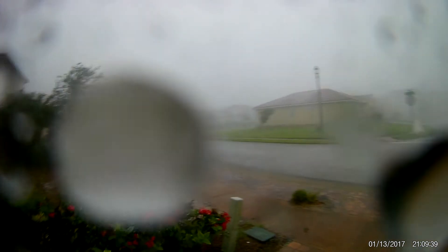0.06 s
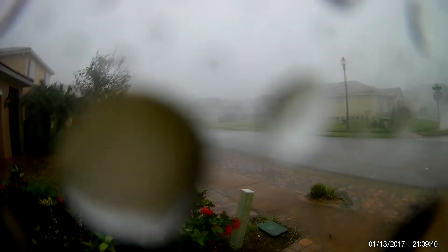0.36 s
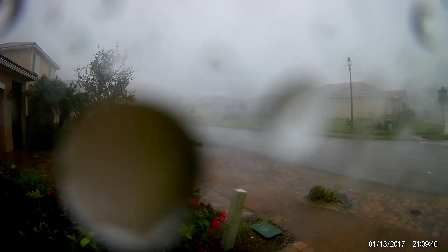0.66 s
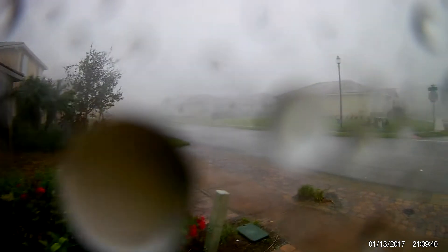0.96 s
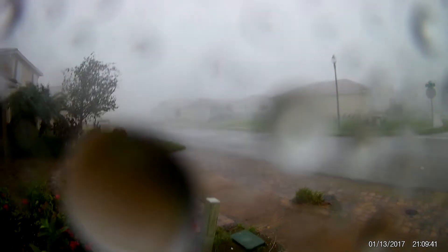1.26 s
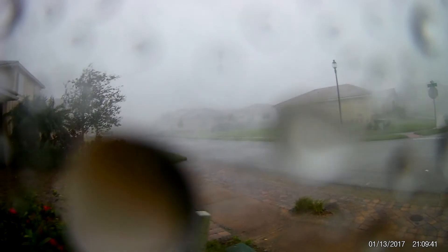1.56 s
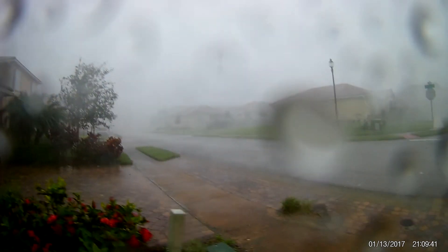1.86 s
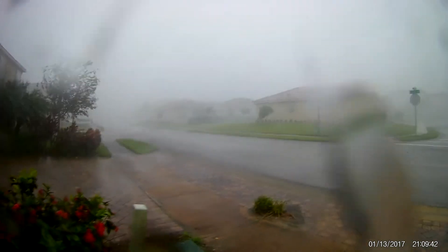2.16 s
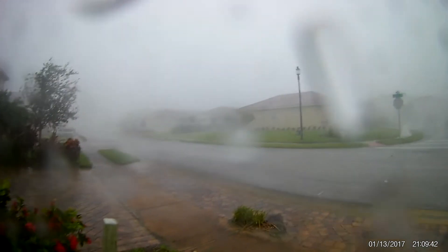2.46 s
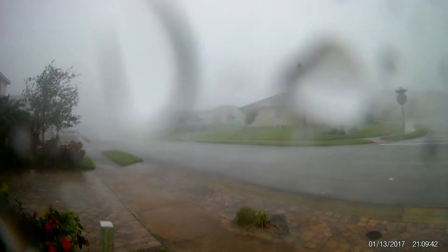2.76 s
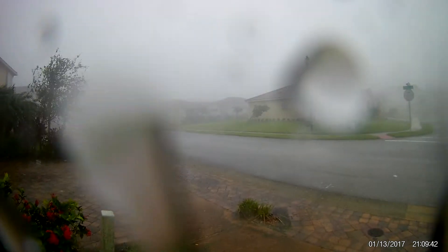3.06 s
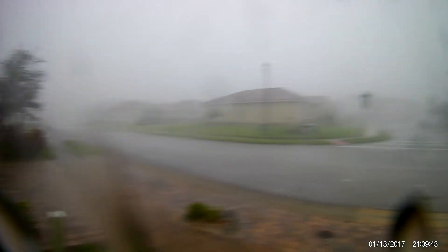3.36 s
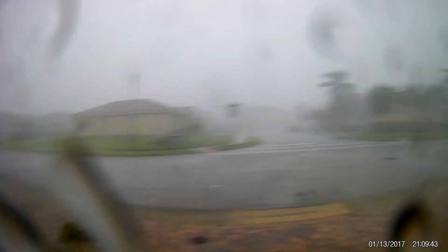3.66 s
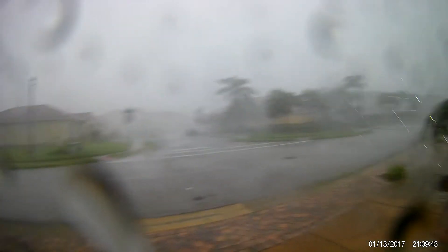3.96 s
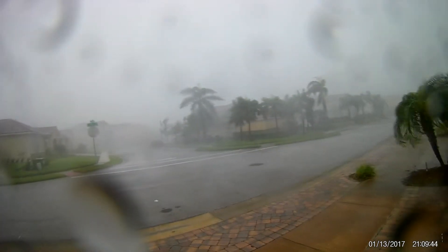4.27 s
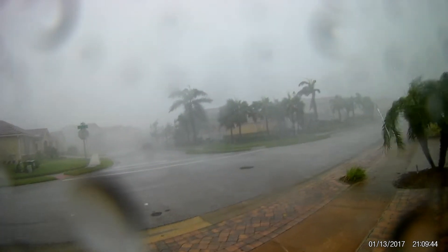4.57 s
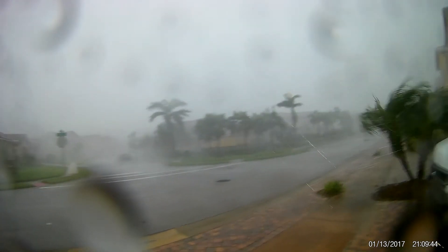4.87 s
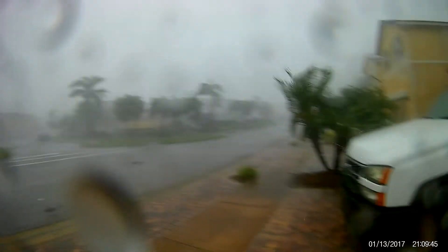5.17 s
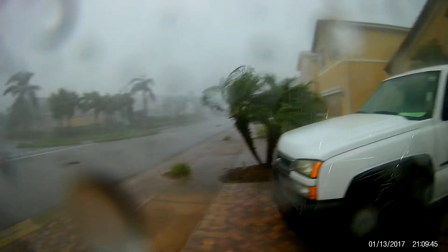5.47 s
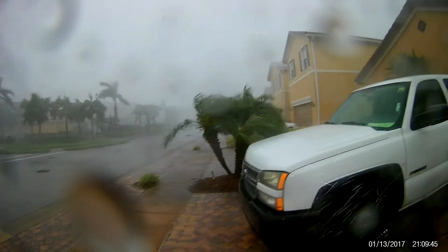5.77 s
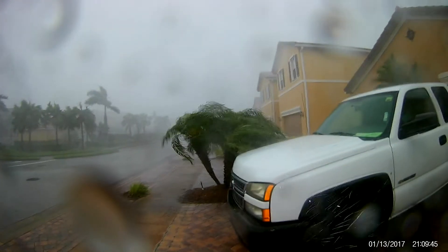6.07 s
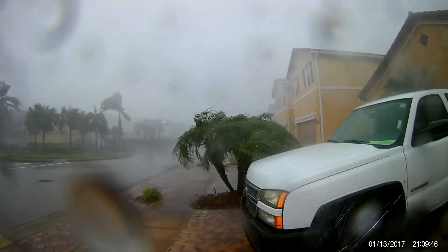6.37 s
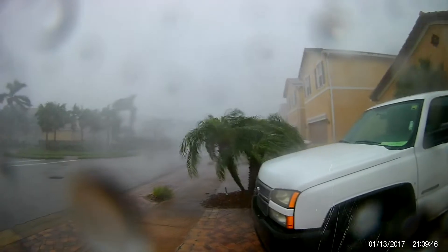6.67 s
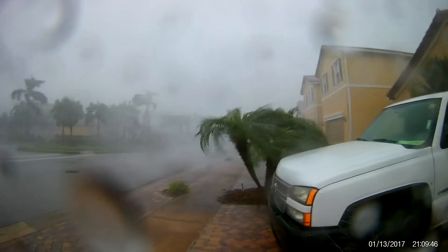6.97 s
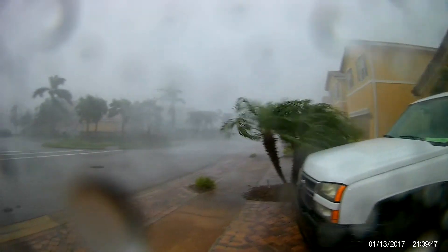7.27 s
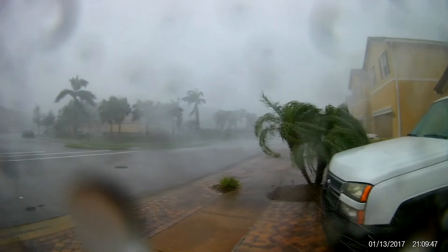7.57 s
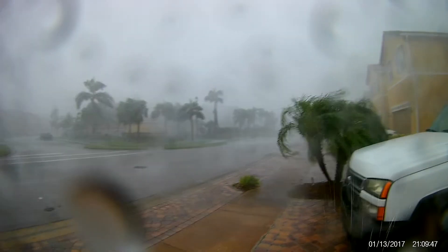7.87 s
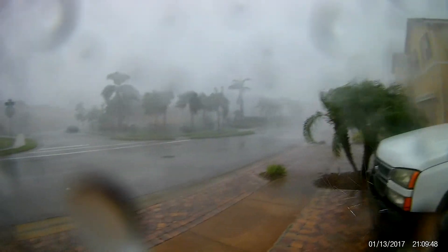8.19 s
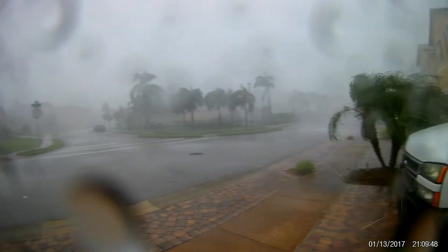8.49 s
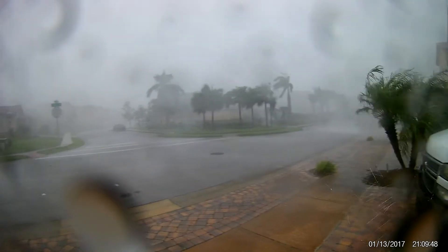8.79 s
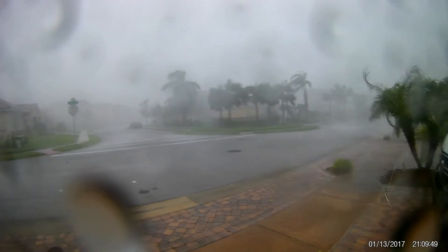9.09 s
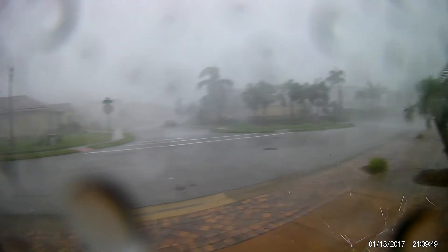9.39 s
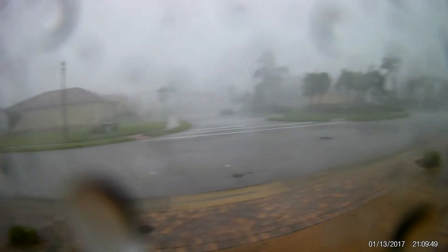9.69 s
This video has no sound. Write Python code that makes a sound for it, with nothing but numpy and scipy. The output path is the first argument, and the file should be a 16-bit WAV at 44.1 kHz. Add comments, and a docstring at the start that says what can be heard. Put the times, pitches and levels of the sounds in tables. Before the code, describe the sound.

Wind-driven rain hits a plastic case around the microphone, making a close, dense crackle of pattering drops, sharp knocks and sizzling spray, with a few tiny plops. Behind it run a muffled wash of rain on the street and a low, uneven wind rumble. The first second is heavy, with sheets of rain and a bright, fading fizz. After a brief easing around 1.5 seconds, a gust gives the case a dull, wet thump at about 2 seconds, and busy tapping continues until 3.5. The rain thins from there to about 5.3, while the rumble swells slightly near 4. Hard knocks return between 5.4 and 6.7 seconds, followed by a lull from 7 to nearly 8. The rain then builds again, with a hissing sheet of spray at 9 seconds, the sharpest knock at about 9.5 and another surge at the end.

```python
"""Wind-driven rain beats on a camera in a waterproof case, held outdoors in a storm.
Each drop rings the plastic for a few milliseconds: big ones knock, small ones patter, spray sizzles.
Some drops trap a bubble and plop. Gusts swell and ease the rain, and midway it meets another wall
of the case. Behind it lie the muffled wash of the street and a low rumble of wind."""
import sys
import numpy as np
from scipy import signal
from scipy.fft import rfft, irfft, next_fast_len
from scipy.io import wavfile
from scipy.ndimage import uniform_filter1d

SR = 44100
rng = np.random.default_rng(int(sys.argv[2]) if len(sys.argv) > 2 else 0)


def unload_wav(signal):
    """Save mono or channel-first audio to the path in sys.argv[1] as 16-bit WAV at rate SR, clipped to [-1, 1]."""
    wavfile.write(
        sys.argv[1],
        SR,
        np.round(np.clip(np.atleast_2d(signal).T, -1, 1) * 32767).astype(np.int16),
    )


N = 438354
TAPS = 1024  # samples in the sound of one drop
TIME, TAP_HZ = np.arange(N) / SR, np.fft.rfftfreq(TAPS, 1 / SR)
THUD_HZ, RING_HZ, SPLASH_HZ, WIND_HZ = (100, 700), (900, 2500), (2600, 7000), (20, 120)
TURN_S = 4.7  # the camera turns, and the rain meets the side wall

# How the plastic case rings when tapped. Each row: frequency in Hz, level in dB.
CASE_TONE = [(40, -19.5), (180, -10.5), (560, -11.5), (820, -6.5), (1120, -9), (1410, 0.5), (2020, -1.5),
             (2450, -12.5), (2950, -11), (4200, -16), (6600, -29.5), (16000, -61.5)]
# How the side wall changes that tone. Each row: frequency in Hz, boost or cut in dB.
SIDE_WALL_TONE = [(350, -10.5), (600, -7), (1300, 3.5), (2100, 1.5), (2600, -3.5), (3400, 5.5), (4700, 0.5),
                  (5600, 1.5)]


def gain_of(db):
    """Turns decibels into a number to multiply a sound by."""
    return 10 ** (np.asarray(db) / 20)


def tone_at(tone, hz):
    """Looks up a tone table's level in dB at the given frequencies."""
    row_hz, row_db = np.transpose(tone)
    return np.interp(np.log(hz + 1), np.log(row_hz + 1), row_db)


def curves(rows):
    """Joins timed rows with straight lines, giving one curve for each column after the time."""
    times, *columns = np.transpose(rows)
    return [np.interp(TIME, times, column) for column in columns]


def band_size(sound, band):
    """How strong a sound is between two frequencies: the square root of its energy there."""
    size = next_fast_len(len(sound))
    hz = np.fft.rfftfreq(size, 1 / SR)
    inside = rfft(sound, size)[(hz > band[0]) & (hz < band[1])]
    return np.sqrt(2 * np.sum(abs(inside) ** 2) / size + 1e-20)


def unit_level(sound, band):
    """Scales a sound so its average (rms) level between two frequencies is 1."""
    return sound * np.sqrt(len(sound)) / band_size(sound, band)


def coloured(sound, tone):
    """Boosts and cuts a sound's frequencies as a tone table says."""
    size = next_fast_len(len(sound) + TAPS)
    gains = gain_of(tone_at(tone, np.fft.rfftfreq(size, 1 / SR)))
    return irfft(rfft(sound, size) * gains, size)[:len(sound)]


def ring(tone_db):
    """The ringing that follows one sharp tap on an object with this tone."""
    log_gain = np.log(gain_of(np.r_[tone_db, tone_db[-2:0:-1]]))
    spectrum = np.exp(np.conj(signal.hilbert(log_gain)))  # minimum phase: no sound before the tap
    return irfft(spectrum[:len(tone_db)])


def add(mix, start_s, sound):
    """Mixes a sound in at its start time."""
    part = mix[max(round(start_s * SR), 0):][:len(sound)]
    part += sound[:len(part)]


def shower(per_s, spread_db, even_s):
    """Random hits of very unequal size, whose power holds steady over even_s seconds."""
    lands = rng.random(N) < per_s / SR
    hits = lands * gain_of(spread_db * np.minimum(rng.exponential(1, N), 4))
    window = int(even_s * SR)
    power = uniform_filter1d(uniform_filter1d(hits ** 2, window), window)
    return hits / np.sqrt(abs(power) + 1e-6)


def rainfall(sheet_fall_s=0.042):
    """Levels in dB of patter, slush (crowded drops) and spray, as gusts and sheets of rain pass."""
    # Slow gusts. Each row: time in seconds, patter and spray levels in relative dB.
    gusts = [(0, -48, -46), (0.8, -47.5, -57.5), (1.35, -46, -54), (1.58, -62.5, -65.5), (1.85, -55, -59),
             (2.25, -40.5, -54), (3.4, -43.5, -61), (4.1, -57, -60), (4.65, -51, -59.5), (5.24, -59.5, -66),
             (5.45, -47.5, -63), (6.7, -41, -62.5), (7.0, -72.5, -75), (7.15, -59, -65.5), (7.84, -54, -65),
             (8.1, -39.5, -56), (8.8, -44, -57.5), (9.1, -50, -90), (9.4, -47, -53.5), (9.94, -47, -63)]
    # Sheets of rain flung at the case.
    # Each row: peak time and build-up in seconds, slush and spray levels in relative dB.
    sheets = [(0.3, 0.053, -36, -51), (0.674, 0.026, -40.5, -55), (0.785, 0.025, -38, -67),
              (2.68, 0.063, -44.5, -70), (4.891, 0.074, -46, -58), (6.8, 0.044, -57, -53),
              (8.98, 0.09, -38.5, -40), (9.24, 0.048, -41.5, -50.5), (9.91, 0.12, -34.5, -55)]
    patter_db, gust_spray_db = curves(gusts)
    sheet_power = np.full((2, N), 1e-12)
    for peak_s, build_s, *levels_db in sheets:
        width_s = np.where(TIME < peak_s, build_s, sheet_fall_s)
        swell = np.exp(-((TIME - peak_s) / width_s) ** 2)
        sheet_power += gain_of(levels_db)[:, None] ** 2 * swell
    slush_power, spray_power = sheet_power
    spray_power += gain_of(gust_spray_db) ** 2
    return patter_db, 10 * np.log10(slush_power), 10 * np.log10(spray_power)


def street(patter_db, level_db=-55.0, follow=0.14):
    """Far rain on paving and trees, heard through the case, swelling a little with the gusts."""
    # The muffled wash of far rain. Each row: frequency in Hz, level in dB.
    wash_tone = [(30, -6.5), (170, -0.5), (500, -11.5), (800, -4), (1030, -9.5), (1400, 0.5), (1950, -1.5),
                 (2550, -18), (3600, -36), (4100, -16), (4700, -27.5), (7000, -26.5), (10000, -56)]
    gust_db = uniform_filter1d(patter_db - patter_db.mean(), size=SR // 4)
    wash = coloured(rng.standard_normal(N), wash_tone)
    return gain_of(level_db + follow * gust_db) * unit_level(wash, RING_HZ)


def wind(trim_db=-3.0, lumpy_db=-1.0, eddies_per_s=9):
    """Swirls of air (eddies) press on the case and make a low, lumpy rumble."""
    # How hard the wind presses. Each row: time in seconds, level in relative dB.
    wind_strength = [(0, -57), (1.1, -50.5), (1.45, -64), (2.08, -58), (3.7, -65), (4.09, -47), (4.4, -57),
                     (5.03, -52.5), (5.3, -62), (7.75, -66), (8.25, -52), (9.1, -56), (9.94, -56)]
    # The wind's deep tone. Each row: frequency in Hz, level in dB.
    rumble_tone = [(10, -3.5), (33, 3.5), (110, -3.5), (2000, -76)]
    rumble_db, = curves(wind_strength)
    eddies = np.interp(TIME * eddies_per_s, np.arange(TAPS), rng.standard_normal(TAPS))
    rumble = coloured(rng.standard_normal(N), rumble_tone) * gain_of(lumpy_db * eddies)
    return gain_of(rumble_db + trim_db) * unit_level(rumble, WIND_HZ)


def air_shoves(lag_s=0.016, slap_s=0.025, dull_hz=1500):
    """Air pulls and pushes the case once; the water it carries lands just after, in a dull squelch."""
    # Each row: time in seconds, push level in dB, push frequency in Hz, water slap level in dB.
    shoves = [(2.076, -30.5, 48.3, -35.5), (8.772, -44, 55, -52)]
    out, size = np.zeros(N), int(slap_s * SR)
    for time_s, push_db, hz, slap_db in shoves:
        phase = 2 * np.pi * hz * (TIME - time_s)
        out += gain_of(push_db) * phase * np.exp((1 - phase ** 2) / 2)
        water = rng.standard_normal(size) * signal.windows.tukey(size)
        water = signal.lfilter(*signal.butter(1, dull_hz, fs=SR), water)
        slap = signal.fftconvolve(water, ring(tone_at(CASE_TONE, TAP_HZ)))
        add(out, time_s + lag_s, gain_of(slap_db) * unit_level(slap, RING_HZ))
    return out


def mist(start_db=-54, fade_db_per_s=11, hz=10300, sharpness=5):
    """The finest droplets of the first gust make a dense, bright fizz that fades away."""
    hits = shower(per_s=1500, spread_db=5.0, even_s=0.12) * rng.choice([-1, 1], N)
    fizz = signal.lfilter(*signal.iirpeak(hz, sharpness, fs=SR), hits)
    return gain_of(start_db - fade_db_per_s * TIME) * fizz


def spray(spray_db, trim_db=-4.0):
    """Thousands of droplets a second sizzle on the case: their shorter blows sound brighter."""
    # The case's tone under fine droplets. Each row: frequency in Hz, level in dB.
    spray_tone = [(100, -24), (600, -0.5), (1100, 1.5), (1500, 5.5), (2050, 7), (2550, -8.5), (3300, -4),
                  (4200, -2.5), (6700, -14), (10500, -33.5), (14000, -42)]
    hits = shower(per_s=2200, spread_db=5.5, even_s=0.05) * rng.choice([-1, 1], N)
    hits = np.where(TIME > TURN_S, coloured(hits, SIDE_WALL_TONE), hits)
    sizzle = signal.oaconvolve(hits, ring(tone_at(spray_tone, TAP_HZ)))[:N]
    return gain_of(spray_db + trim_db) * unit_level(sizzle, SPLASH_HZ)


def bubble(hz, fade_cycles=1.93):
    """A bubble caught under a drop rings for a few cycles; its energy is 1."""
    cycles = hz * np.arange(TAPS) / SR
    sound = np.sin(2 * np.pi * cycles) * (1 - np.exp(-cycles)) * np.exp(-cycles / fade_cycles)
    return sound / np.linalg.norm(sound)


def spot_tone(spread_db):
    """Each spot on the case sounds a little different: random bumps in its tone, in dB."""
    bumps_hz = np.geomspace(500, 12000, num=22)
    return spread_db * np.interp(TAP_HZ, bumps_hz, rng.standard_normal(len(bumps_hz)))


def drop(turned, thud_db, splash_db, wetness, spot_db=5.0, blow_s=.00007, splatter_s=0.00092,
         rebound=0.52, tinkle_db=8, tinkle_hz=3300):
    """One drop rings the case: a blow, a weak rebound, splatter as it flattens and a tiny bubble."""
    t = np.arange(TAPS) / SR
    wall_db = tone_at(CASE_TONE, TAP_HZ) + turned * tone_at(SIDE_WALL_TONE, TAP_HZ)
    wall_db += spot_tone(spot_db * min(wetness, 1))
    blow = t * np.exp(-t / blow_s)
    rebound_delay = int(rng.uniform(.001, .005) * SR)
    blow += rebound * wetness * np.roll(blow, rebound_delay)
    fade_s = splatter_s * 2 ** rng.uniform(-1.5, 1)
    splatter = np.diff(rng.standard_normal(TAPS) * t * np.exp(-t / fade_s), prepend=0)
    tinkle = bubble(tinkle_hz * np.sqrt(2) ** rng.uniform(-0.89, 1), fade_cycles=4)
    force = blow / band_size(blow, RING_HZ) + wetness * splatter / band_size(splatter, RING_HZ)
    force += wetness * gain_of(tinkle_db) * tinkle
    plain = signal.fftconvolve(force, ring(wall_db))[:TAPS]
    # Tilt the bass and treble: a square hit pushes the wall in and thuds, a glancing one splashes.
    low_db, mid_db, high_db = (20 * np.log10(band_size(plain, band))
                               for band in (THUD_HZ, RING_HZ, SPLASH_HZ))
    tilt = [(420, thud_db - low_db + mid_db), (1200, 0), (2100, 0), (2900, splash_db - high_db + mid_db)]
    sound = signal.fftconvolve(force, ring(wall_db + tone_at(tilt, TAP_HZ)))[:TAPS]
    return sound / band_size(sound, RING_HZ)


def patter(patter_db, slush_db, thud_db=-17, splash_db=-11.0, vary_db=6.0, wetness=0.51,
           bubble_db=-9.5, bubble_vary_db=4, spots=32):
    """Small drops hit the wall facing the wind, singly or in sheets, with faint or clear bubbles."""
    hits = shower(per_s=105, spread_db=6.0, even_s=0.085) * gain_of(patter_db)
    hits += shower(per_s=440, spread_db=6.0, even_s=0.021) * gain_of(slush_db)
    spot_hit, out = rng.integers(0, spots, N), np.zeros(N)
    colours = vary_db * rng.standard_normal((spots, 2)) + [thud_db, splash_db]
    pitches_hz = rng.permutation(np.geomspace(540, 2100, num=spots))
    levels_db = bubble_db + bubble_vary_db * np.linspace(-2, 2, spots)
    bubbles = [gain_of(db) * bubble(hz) for db, hz in zip(levels_db, pitches_hz)]
    walls = [[drop(turned, *colour, wetness) for colour in colours] for turned in (False, True)]
    for i in np.flatnonzero(hits):
        wall, spot = walls[int(TIME[i] > TURN_S)], spot_hit[i]
        add(out, TIME[i], hits[i] * (wall[spot] + bubbles[spot]))
    return out


def big_drops(splat_db=-6, splat_thud_db=-15, splat_splash_db=-12, droplet_db=-15, droplet_lag_s=.007):
    """Heavy drops knock and throw a droplet that lands just after; a plop is a splat and a bubble."""
    # Heavy drops on the case. Each row: start in seconds, ring level in dB,
    # then the low thud and the high splash, both in dB compared with the ring.
    knocks = [(0.1753, -11.5, -26, 0.5), (0.258, 10.5, -50, -13), (0.2761, 10, -28, -10),
              (0.3323, -1.5, -14, -23), (0.3716, 4, -22, -14), (0.391, -0.5, -26, -11),
              (0.482, 8, -36, -13.5), (0.514, 2.5, -16, -13), (0.5304, 6, -17, -18), (0.567, 3.5, -20, -15),
              (0.591, 5.5, -13.5, -14), (0.6, 5.5, -62, -13), (0.646, -3.5, -13, -5.5),
              (0.6806, -6, -15, -9), (0.7607, -2, -12, -17), (0.802, 0, -12, -31),
              (0.8259, 5.5, -17.5, -13), (0.8714, -0.5, -9.5, -5.5), (0.8995, -5, -14, -9),
              (0.983, -1.5, -64, -14.5), (1.0398, -2, -17, -11), (1.1131, -5.5, -11.5, -10.5),
              (1.2465, -11, -38, 0), (1.3826, -12, -48, -4.5), (1.666, -13.5, -20, -7.5),
              (1.709, -6, -0.5, -15.5), (1.9734, 3.5, -11.5, -2.5), (2.0036, -7, -2, -2),
              (2.011, 2.5, -21, -11.5), (2.033, 9, -22, -5), (2.1178, -1.5, -31, -12),
              (2.1346, -2, -6.5, -6.5), (2.2686, 1.5, -17.5, -12), (2.2837, 2, -29, -22.5),
              (2.41, 2.5, -56, -7.5), (2.4518, -8, -17, 1), (2.4653, -0.5, -21, -3.5),
              (2.482, -5.5, -4, -26), (2.495, -6.5, -42, -11), (2.5653, -4, -34, -14),
              (2.6019, -5.5, -7.5, -11), (2.672, -1.5, -12, -8.5), (2.6872, -3, -3, -13),
              (2.715, 4, -22, -11.5), (2.7315, -1, -47, -13), (2.7537, -0.5, -49, -12.5),
              (2.784, -3.5, -4.5, -12), (2.798, -2.5, -17, -12), (2.855, -2, -22, -13),
              (2.8759, 0, -23, -5), (2.898, 3, -21, -10.5), (2.9812, 6, -43, -10), (3.0484, -1.5, -13, -17),
              (3.142, -7, -26, -2.5), (3.1593, -0.5, -19, -8.5), (3.2, -3.5, -7, -18),
              (3.237, -5, -27, -40), (3.28, -4.5, -28, -39), (3.3045, -6, -28, -27),
              (3.3969, 6.5, -55, -19), (3.5314, -2.5, -28, -9), (3.7954, -8.5, -32, -15),
              (4.325, -15, -19, -6.5), (4.591, -10, -14, -16), (4.703, -8.5, -18, -34),
              (4.843, -10.5, -14, -9), (5.3888, 6.5, -10.5, -14), (5.455, -3, -12, -16.5),
              (5.5195, 1, -6, -18), (5.6439, 9, -5, -21.5), (5.705, -7, -18, -24), (5.8187, 2.5, -31, -7.5),
              (5.8765, 3, -13, -20), (5.9534, 0.5, -4.5, -9), (6.2002, 10.5, -21, -14),
              (6.216, 4.5, -14.5, -9.5), (6.238, -2.5, -9, -8.5), (6.344, 2.5, -16, -15),
              (6.384, -9, -11, 0.5), (6.438, -9.5, -17, -6), (6.462, -26, -23, 11),
              (6.482, -3.5, -2.5, -2.5), (6.4917, -3, -8, -41), (6.5, -2, -17, -6.5),
              (6.5944, 12, -21.5, -13.5), (6.6207, 8.5, -21, -8), (6.6621, -4, -9, -18),
              (6.6687, -2, -27, -12), (6.716, -5, -47, -5.5), (7.4485, -17, -22, -6),
              (7.703, -6, -9.5, -11), (7.9949, -3, -5, -9.5), (8.0185, -1.5, -3.5, -6.5),
              (8.0921, -6.5, -4, -5), (8.1956, -1, -10.5, -15), (8.239, -6.5, -10, -16),
              (8.2867, 1, -4, -13), (8.4703, -7.5, 4.5, -9), (8.4892, 4.5, -12.5, -11.5),
              (8.6493, -2.5, -6.5, -41), (8.7844, -11, -2, 1), (8.847, -2.5, -11.5, -11),
              (8.9275, 2, -8, -13), (9.173, -6, -16, -13.5), (9.33, -8.5, -10.5, -14),
              (9.403, -8.5, -9, -2.5), (9.4506, 17.5, -7, -23), (9.475, -2.5, -8, -3.5),
              (9.525, -1, -19, -3), (9.5378, 4.5, -18, -13), (9.6183, -4.5, -4, -5.5),
              (9.689, -5, -12.5, -12), (9.72, 3, -9.5, -18), (9.729, -1.5, -15, -14),
              (9.8894, -0.5, -11, -13), (9.9138, 0, -13, -33), (9.9378, 10, -42, -12.5)]
    # Drops landing in water already on the case. Each row: start in seconds, level in dB, pitch in Hz.
    plops = [(0.807, -10, 875), (1.989, -13, 716), (2.619, -7.5, 756), (4.634, -14.5, 840),
             (6.327, -10, 810), (6.448, -8, 735)]
    out = np.zeros(N)
    for start_s, db, thud_db, splash_db in knocks:
        turned = start_s > TURN_S
        wetness = gain_of(splash_db / 2)  # glancing, splashy drops are the wettest
        add(out, start_s, gain_of(db) * drop(turned, thud_db, splash_db, wetness))
        droplet = drop(turned, splat_thud_db, splat_splash_db, wetness=0.74)
        lag_s = droplet_lag_s * 2 ** rng.uniform(-1.01, 1)
        add(out, start_s + lag_s, gain_of(db + droplet_db) * wetness * droplet)
    for start_s, db, hz in plops:
        splat = gain_of(splat_db) * drop(start_s > TURN_S, splat_thud_db, splat_splash_db, wetness=1)
        add(out, start_s, gain_of(db) * (bubble(hz) + splat))
    return out


def scene():
    """Rain on the case, the street behind it, and the wind, in one channel."""
    patter_db, slush_db, spray_db = rainfall()
    rain = big_drops() + patter(patter_db, slush_db) + spray(spray_db) + mist()
    return (rain + street(patter_db) + wind() + air_shoves())[None]


def record(dry, ceiling=.88, hiss_db=-77, top_hz=16000):
    """The hardest knocks overload the microphone; it adds its tone and hiss and cuts the top treble."""
    # The microphone's tone, with a deep dip near 8 kHz. Each row: frequency in Hz, boost or cut in dB.
    microphone_tone = [(6600, 2), (7300, -6), (7900, -26), (8200, -12), (8700, -5), (11000, -2.5),
                       (13000, -15)]
    squashed = dry[0] / (1 + (dry[0] / ceiling) ** 8) ** (1 / 8)
    sound = coloured(squashed, microphone_tone) + gain_of(hiss_db) * rng.standard_normal(N)
    treble_cut = signal.firwin(511, top_hz, window=("kaiser", 9), fs=SR)
    return signal.oaconvolve(sound, treble_cut, "same")[None]


dry = scene()
out = record(dry)
unload_wav(out)
```